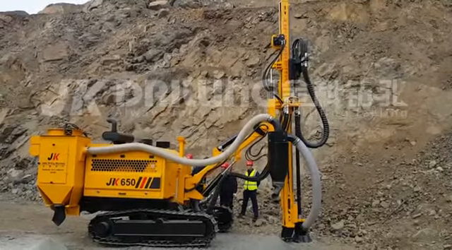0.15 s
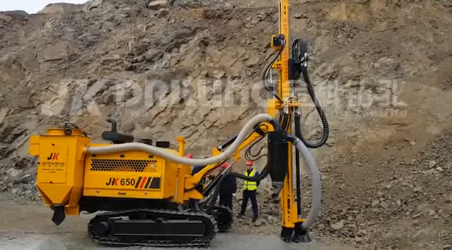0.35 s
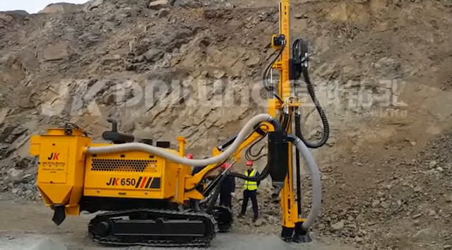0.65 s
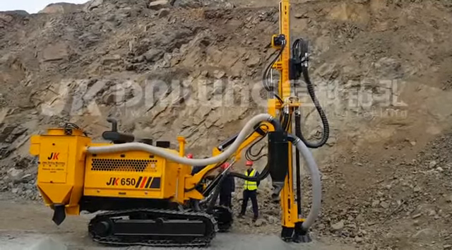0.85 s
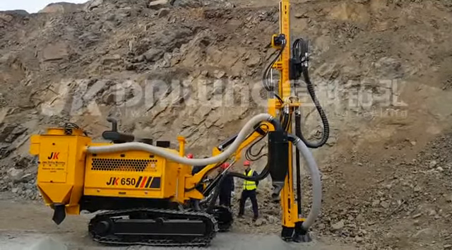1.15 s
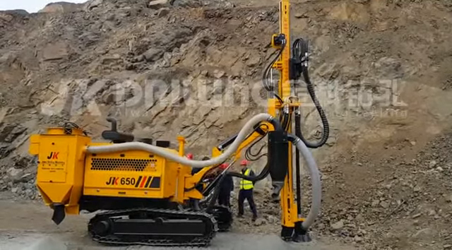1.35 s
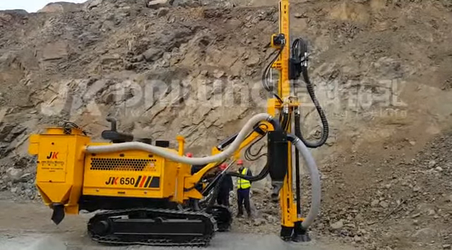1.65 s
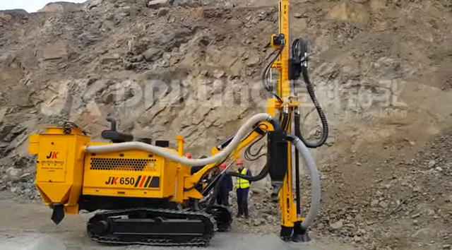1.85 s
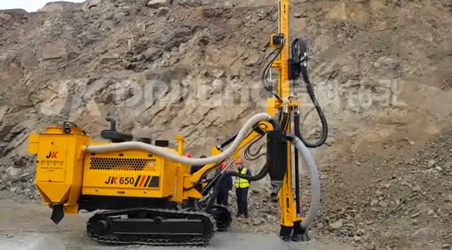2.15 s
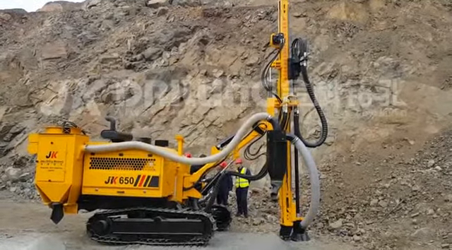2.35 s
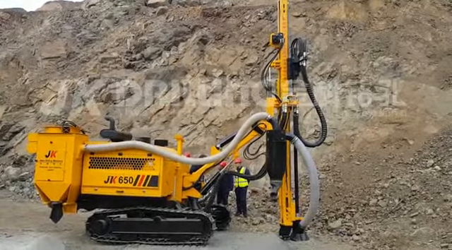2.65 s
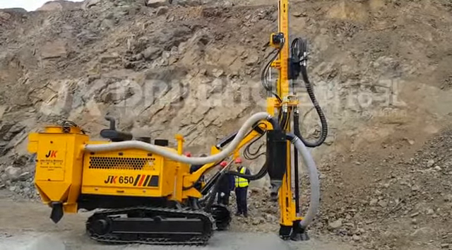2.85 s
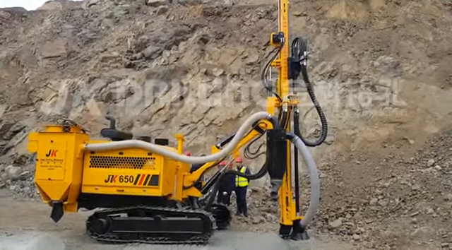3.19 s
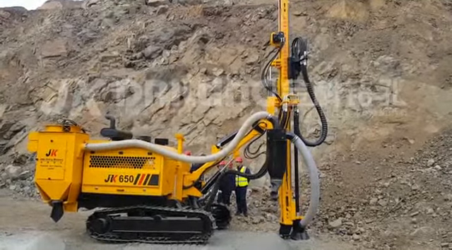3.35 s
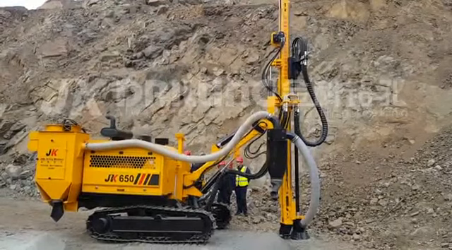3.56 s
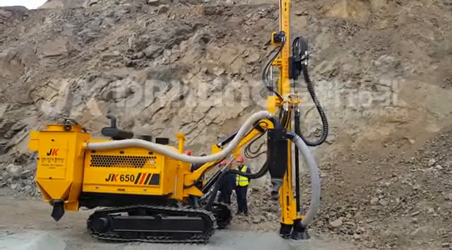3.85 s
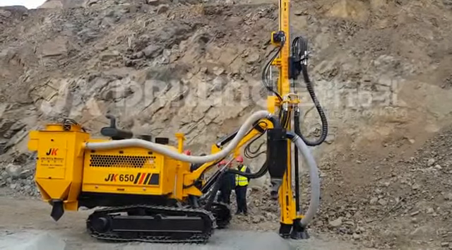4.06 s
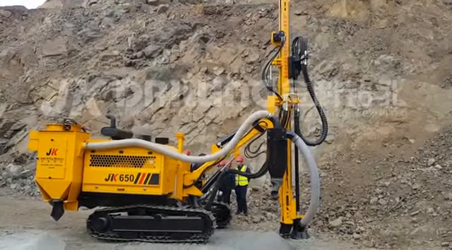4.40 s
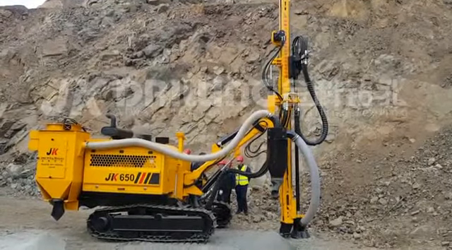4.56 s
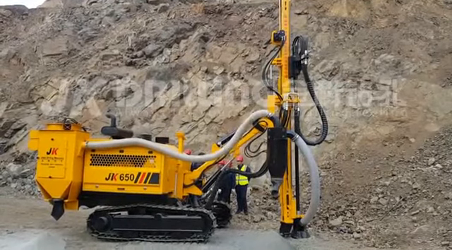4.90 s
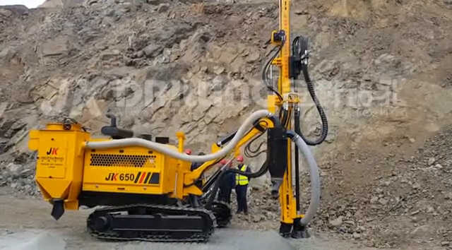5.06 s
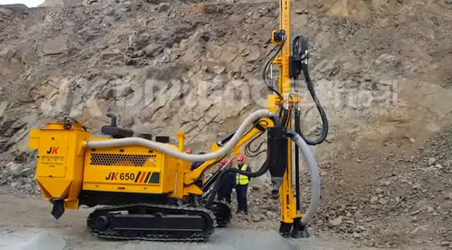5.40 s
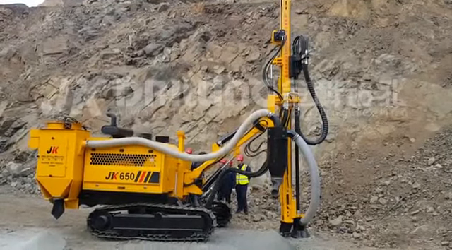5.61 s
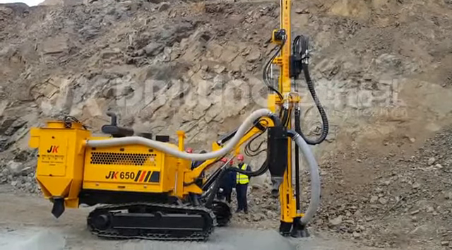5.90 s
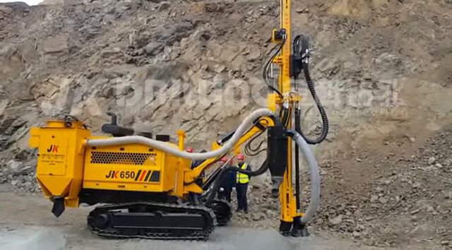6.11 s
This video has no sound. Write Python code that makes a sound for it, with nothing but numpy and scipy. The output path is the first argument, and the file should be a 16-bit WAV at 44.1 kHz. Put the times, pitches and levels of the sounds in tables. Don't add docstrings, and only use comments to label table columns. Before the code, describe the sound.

A dense, nearly constant wall of machine noise: broad engine roar, droning low hums, stacked clean whining tones and rushing air pulsing with very fast hammer blows. A puff of flushing air comes after about a second, a rough friction cry near five seconds, and a tiny dip in level just before the end. Heard a few metres away in an open quarry through a close stereo microphone, gritty, clipped and lacking top treble.

```python
import sys
import numpy as np
from scipy import signal
from scipy.fft import rfft, irfft, dct
from scipy.io import wavfile
from scipy.ndimage import uniform_filter1d

SR = 44100
rng = np.random.default_rng(int(sys.argv[2]) if len(sys.argv) > 2 else 0)


def waveform_to_disk(signal):
    frames = np.transpose(np.atleast_2d(signal))
    scaled = np.clip(frames, -1, 1) * 32767
    samples = np.round(scaled).astype(np.int16)
    wavfile.write(sys.argv[1], SR, samples)


def gain_from_db(level_db):
    decades = np.asarray(level_db, float) / 20
    return 10 ** decades


N = 275184
SECONDS = np.arange(N) / SR


def rms_one(x):
    return x / np.sqrt(np.mean(x ** 2) + 1e-20)


def in_time(rows):
    times, *columns = np.transpose(rows)
    return [np.interp(SECONDS, times, column) for column in columns]


def drift(rate):
    r = np.exp(-80 * np.pi * rate / SR)
    white = rng.standard_normal(N // 40 + 2002)
    slow = signal.lfilter([1], [1, -2 * r, r * r], white)[2000:]
    return np.interp(np.arange(N) / 40, np.arange(len(slow)), rms_one(slow))


def colour(x, spectrum):
    hz, db = np.transpose(spectrum)
    log_hz = np.log(np.maximum(np.arange(N // 2 + 1) * SR / N, 1))
    return irfft(rfft(x) * gain_from_db(np.interp(log_hz, np.log(hz), db)), N)


def resonance(x, hz, width):
    r = np.exp(-np.pi * width / SR)
    poles = [1, -2 * r * np.cos(2 * np.pi * hz / SR), r * r]
    return signal.lfilter([(1 - r * r) / 2, 0, (r * r - 1) / 2], poles, x)


def ports(shared, opposed):
    return np.array([shared + opposed, shared - opposed])


def turbulence(shared, opposed, low, high, patchy_db, rate):
    white = rng.standard_normal((2, 2, N))
    flat = 0
    edges = np.geomspace(low, high, int(3 * np.log2(high / low)))
    for k, band in enumerate(zip(edges, edges[1:])):
        band_filter = signal.butter(2, band, "band", fs=SR, output="sos")
        part = signal.sosfilt(band_filter, white[k % 2])
        flat = flat + part * gain_from_db([db * drift(rate) for db in patchy_db])
    per_hz = [rms_one(part) * np.sqrt(high - low) for part in flat]
    return ports(colour(per_hz[0], shared), colour(per_hz[1], opposed))


# (time [s], level [dB])
OVERALL_LEVEL = [(0.0, -11), (0.08, -13.5), (1.02, -13.5), (1.49, -12.5), (1.51, -14.5), (1.91, -14.5), (2.08, -13),
                 (3.68, -14), (3.94, -16.5), (3.98, -14.5), (4.36, -14), (4.4, -20), (4.41, -14.5), (5.84, -12.5),
                 (5.86, -11.5), (6.17, -14), (6.24, -11.5)]


def level_swing():
    db, = in_time(OVERALL_LEVEL)
    return db - db.mean()


# (time [s], lead on the mean rate [cycles])
BLOW_TIMING = [
    (0, -.16),
    (1.0, -.13),
    (2.0, .05),
    (3.0, -0.2),
    (4.2, -0.17),
    (4.5, -0.55),
    (6.24, -.51),
]
BLOWS_PER_S = 21.6


def blows_struck():
    return BLOWS_PER_S * SECONDS + in_time(BLOW_TIMING)[0] + 1


# (frequency [Hz], density [dB per Hz])
AIR_SHARED = [(1450, -90.5), (1700, -57), (2230, -50), (2320, -55.5), (2850, -62.5), (3130, -70.5),
              (3320, -78), (3480, -70.5), (3880, -69), (4000, -74.5), (4600, -75), (5500, -77), (6300, -73),
              (7000, -76.5)]
# (frequency [Hz], density [dB per Hz])
AIR_OPPOSED = [(1450, -85), (1700, -61.4), (2230, -54.4), (2320, -57.5), (2850, -57.3), (3130, -66.4),
               (3320, -71.5), (3480, -68.0), (3880, -68.2), (4000, -72.1), (4600, -76.1), (5500, -76.2),
               (6300, -76.9), (7000, -80.0)]


def cooling_air(air_db, hiss_db):
    air = turbulence(AIR_SHARED, AIR_OPPOSED, low=1200, high=9000, patchy_db=[1.7, 1.7], rate=10)
    above_3300_hz = signal.butter(4, 3300, "high", fs=SR, output="sos")
    top = signal.sosfiltfilt(above_3300_hz, air)
    exhaust_db = 2.2 * np.cos(2 * np.pi * (blows_struck() - .17))
    return gain_from_db(air_db + exhaust_db - 2.0) * (air - top) + gain_from_db(hiss_db) * top


# (frequency [Hz], density [dB per Hz])
ROAR_SHARED = [(25, -75), (45, -60), (68, -62), (115, -51), (190, -49), (300, -47.5), (440, -51.5),
               (600, -53.5), (760, -52.5), (950, -50.5), (1200, -53), (1450, -56), (1700, -64.5),
               (2000, -84.5)]
# (frequency [Hz], density [dB per Hz])
ROAR_OPPOSED = [(25, -78), (45, -70), (68, -66), (115, -66), (190, -67), (300, -69), (440, -62), (600, -63),
                (760, -63), (950, -62), (1200, -62), (1450, -56), (1700, -61.5), (2000, -85)]
# (frequency [Hz], width [Hz], level [dB])
HUMS = [(82.7, 4.4, -34.5), (92.53, 7.8, -31.5), (160.4, 14, -32), (218, 9, -29), (655, 7.3, -41.5)]


def diesel(roar_db):
    roar = turbulence(ROAR_SHARED, ROAR_OPPOSED, low=20, high=2400, patchy_db=[.5, 3.0], rate=9)
    white = rng.standard_normal(N)
    hums = 0
    for hz, width, db in HUMS:
        hum = resonance(resonance(white, hz, width), hz, width)
        hums = hums + gain_from_db(db) * rms_one(hum)
    return gain_from_db(roar_db) * (roar + hums)


# (time [s], lobe rate [Hz])
SCREW_SPEED = [(0.0, 536.6), (0.7, 537.0), (1.3, 537.8), (1.8, 535.6), (2.4, 536.2), (3.4, 536.9),
               (4.3, 537.8), (5.0, 538.0), (5.75, 539.0), (6.24, 538.8)]
# (multiple of lobe rate, left peak [dB], right peak [dB], left lead [rad], flutter [dB])
UPPER_WHINE = [(3, -38.5, -22, 3, 2.5), (6, -32, -31, -2, 2.5), (8, -35, -60, -2, 3)]


def compressor():
    lobe_hz, = in_time(SCREW_SPEED)
    turn = 2 * np.pi * np.cumsum(lobe_hz + .35 * drift(9)) / SR
    first_db = -20.5 + 0.027 * SECONDS
    second_db = -19.5 + 0.25 * SECONDS
    fourth_left_db = -17.5 - 0.61 * SECONDS
    fourth_right_db = -16 + 0.016 * SECONDS
    lines = [
        (1, first_db + 2.0, first_db + 1.5, 0.28, 1.0),
        (2, second_db + 0.19, second_db + 4.5, 0.23, 1.9),
        (4, fourth_left_db + 2.0, fourth_right_db + 3.0, 2.46, 1.7),
        *UPPER_WHINE]
    out = np.zeros((2, N))
    for multiple, left_db, right_db, lead, flutter_db in lines:
        flutter = gain_from_db(flutter_db * np.clip(drift(18), -3, 1.5))
        sway = 0.084 * drift(1)
        out[0] += flutter * gain_from_db(left_db) * np.sin(multiple * turn + lead + sway)
        out[1] += flutter * gain_from_db(right_db) * np.sin(multiple * turn)
    return out * gain_from_db(0.8 * level_swing())


# (time [s], pitch [Hz], level [dB])
SQUEAL = [
    (5.06, 627, -46),
    (5.12, 645, -21.5),
    (5.2, 655, -34.5),
    (5.28, 630, -22),
    (5.33, 644, -21.5),
    (5.38, 615, -46),
]


def squeal():
    hz, db = in_time(SQUEAL)
    db = np.where(np.abs(SECONDS - 5.22) < .16, db, -120)
    tone = np.sqrt(2) * gain_from_db(db + 1.2 * drift(25)) * np.sin(2 * np.pi * np.cumsum(hz) / SR)
    return tone * gain_from_db([[-1.5], [1.5]])


# (frequency [Hz], width [Hz], level [dB], share in opposition [0-1])
ROD = [(1000, 500, -35, .1), (1830, 90, -31, .45), (1995, 70, -23.5, .15), (2085, 50, -30, .5),
       (2450, 500, -33.5, .6), (2611, 12, -35, .6), (2720, 60, -33.5, .6), (3035, 50, -36.5, .9),
       (3750, 500, -48, .5), (6200, 1500, -53, .2)]


def hammer(air_db):
    cycle = blows_struck()
    since = cycle % 1 / BLOWS_PER_S
    strength = gain_from_db(1.3 * rng.standard_normal(200))[cycle.astype(int)]
    burst = (1 - np.exp(-since / .004)) * (np.exp(-since / .007) + .06)
    crush = rng.standard_normal((2, N)) * burst * strength * gain_from_db(air_db)
    out = 0
    for hz, width, db, opposed in ROD:
        share = np.clip(opposed, 0, 1)
        damped_width = 1.71 * width
        ring = resonance(resonance(crush, hz, damped_width), hz, damped_width)
        shared, against = rms_one(ring)
        out = out + gain_from_db(db) * ports(np.sqrt(1 - share) * shared, np.sqrt(share) * against)
    return out


# (frequency [Hz], left minus right [dB])
BALANCE = [(300, 0.0), (800, -0.6), (1200, -0.4), (1450, -2.5), (1800, 1.3), (2230, 0.9), (2850, 1.4),
           (3200, -1.5), (3500, 2.2), (3880, 3.9), (4600, 3.1), (5500, 1.2), (6800, 0.3), (7300, 2.1)]


def scene():
    overall_db = level_swing()
    gusts_per_s = 4.0
    roar_db = 0.8 * overall_db + 0.4 * drift(gusts_per_s) + 0.36
    air_db = 0.54 * overall_db + 0.16 * drift(gusts_per_s) - .1
    hiss_db = 0.96 * overall_db + 1.03 * drift(gusts_per_s) + 0.072
    hiss_db = hiss_db + 3.0 * np.exp(-((SECONDS - 1.2) / 0.18) ** 2)
    noise = cooling_air(air_db, hiss_db) + diesel(roar_db) + hammer(air_db)
    lean = np.array(BALANCE, float)
    left = colour(noise[0], lean * [1, .5])
    right = colour(noise[1], lean * [1, -.5])
    return np.array([left, right]) + compressor() + squeal()


BANDS = [(4, 10), (8, 7), (12, 4), (16, 2), (20, 2), (24, 2), (28, 2), (32, 21)]
# (frequency [Hz], drop point re neighbours [dB], rounding step re neighbours [dB],
# gentler treatment of the difference [dB])
MASKING = [(0, -12.5, -5, 0), (2330, -14, -7, 2), (2600, -5.5, 3.5, 5), (3100, -6, 2.5, 5),
           (3450, -10, -2, 2), (4650, -9.5, -4, 0), (5700, -4.5, -2, 0), (7600, -5.5, -2, 1)]


def thrifty_storage(x, chance_db, hop=1024):
    frames, half = N // hop + 2, hop // 2
    cutoff_hz = 7600
    window = np.sin(np.pi * (np.arange(2 * hop) + .5) / (2 * hop))
    padded = np.pad(ports(*x) / 2, ((0, 0), (hop, frames * hop - N)))
    places = np.arange(frames)[:, None] * hop + np.arange(2 * hop)
    a, b, c, d = np.split(padded[:, places] * window, 4, axis=2)
    folded_in = np.concatenate([-c[..., ::-1] - d, a - b[..., ::-1]], axis=2)
    lines = dct(folded_in, type=4, norm="ortho")

    starts = np.cumsum([0, *np.repeat(*np.transpose(BANDS))])
    sizes = np.diff(np.append(starts, hop))
    level = np.add.reduceat(lines ** 2, starts, axis=2) / sizes
    mask = uniform_filter1d(level.sum(axis=0), size=3, axis=1)
    hz, *columns = np.transpose(MASKING)
    band_hz = starts * SR / (2 * hop)
    mask_db, step_db, spared_db = [np.interp(band_hz, hz, column) for column in columns]
    chance = chance_db * rng.standard_normal(level.shape)
    chance = chance - spared_db * np.array([[[0]], [[1]]])
    kept = level > mask * gain_from_db(2 * (mask_db + chance))
    step = np.repeat(np.sqrt(mask + 1e-12) * gain_from_db(step_db + chance), sizes, axis=2)
    lines = np.round(lines / step) * step * np.repeat(kept, sizes, axis=2)
    lines[..., int(cutoff_hz / SR * 2 * hop):] = 0

    folded = dct(lines, type=4, norm="ortho")
    p, q = folded[..., :half], folded[..., half:]
    parts = np.concatenate([q, -q[..., ::-1], -p[..., ::-1], -p], axis=2) * window
    joined = parts[:, :-1, hop:] + parts[:, 1:, :hop]
    return ports(*joined.reshape(2, -1)[:, :N])


def roll_off(x):
    return signal.sosfilt(signal.butter(12, 8650, fs=SR, output="sos"), x)


def record(dry):
    since = SECONDS - 6.184
    duck_db = -8.0 * (since > 0) * np.exp(-np.abs(since) / .014)
    ducked = dry * gain_from_db(duck_db)
    rounded = ducked / (1 + (ducked / 1.3) ** 4) ** (1 / 4)
    stored = thrifty_storage(rounded, chance_db=2.8)
    mix = np.clip(stored, -1, 1)
    return roll_off(mix)


dry = scene()
out = record(dry)
waveform_to_disk(out)
```